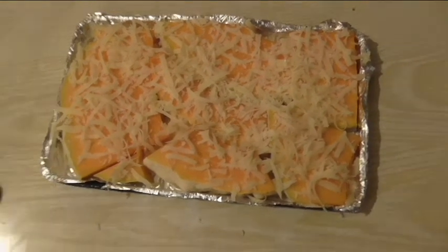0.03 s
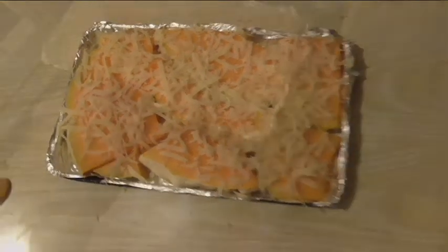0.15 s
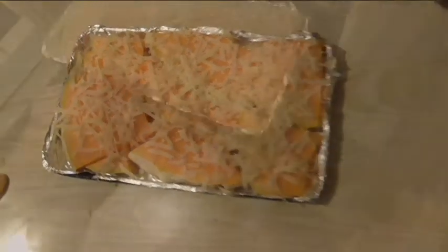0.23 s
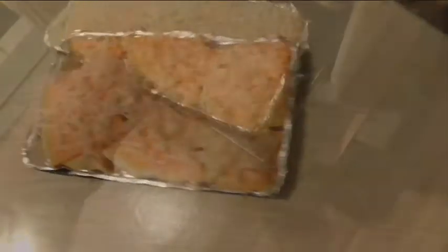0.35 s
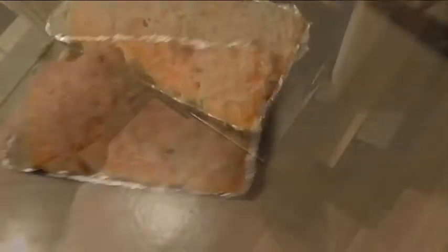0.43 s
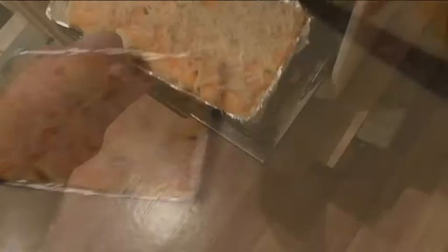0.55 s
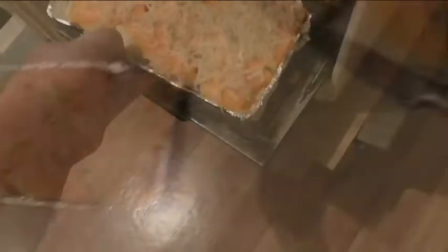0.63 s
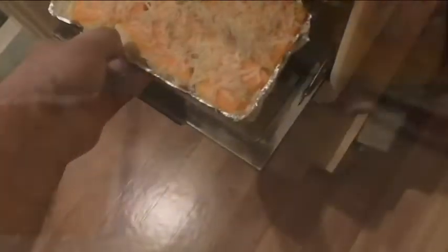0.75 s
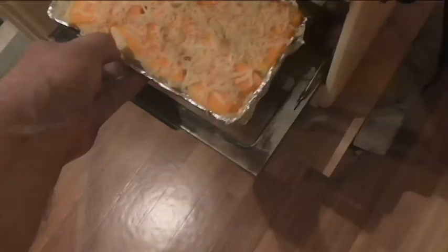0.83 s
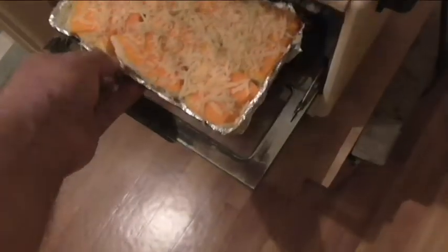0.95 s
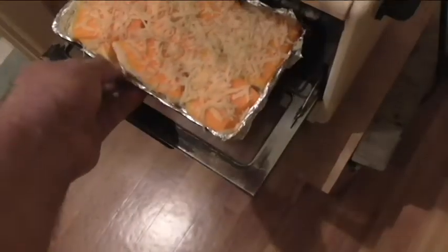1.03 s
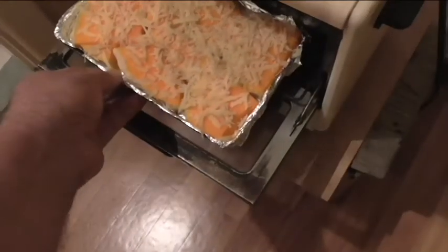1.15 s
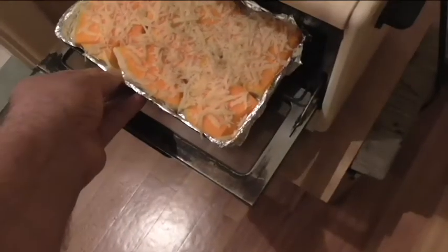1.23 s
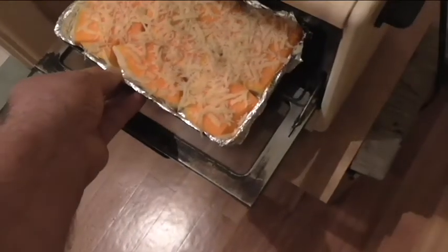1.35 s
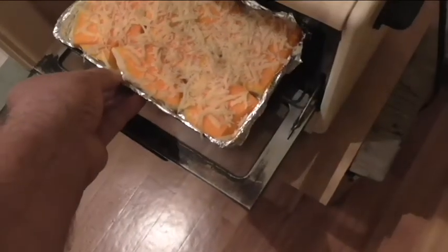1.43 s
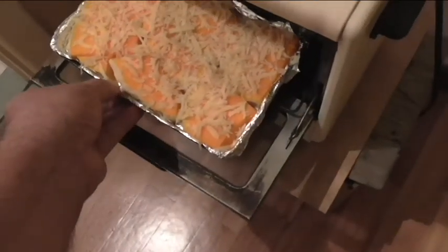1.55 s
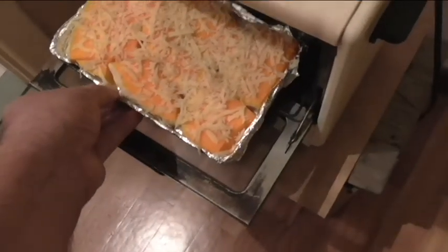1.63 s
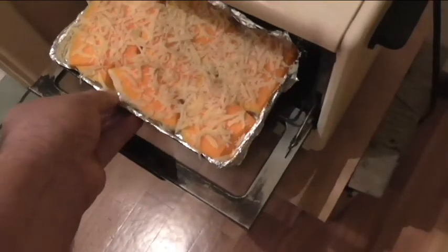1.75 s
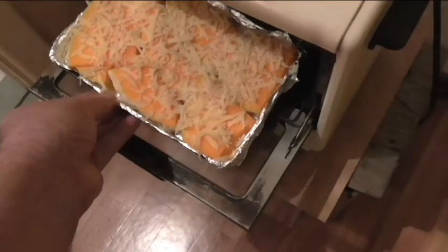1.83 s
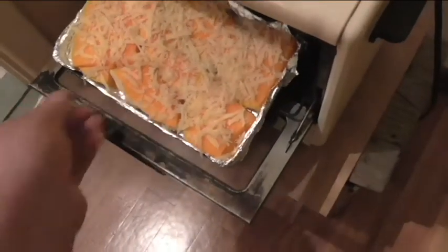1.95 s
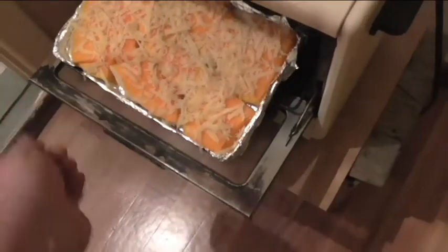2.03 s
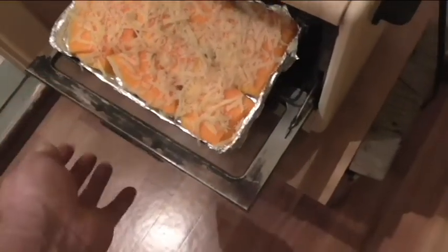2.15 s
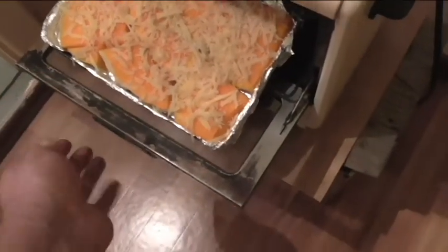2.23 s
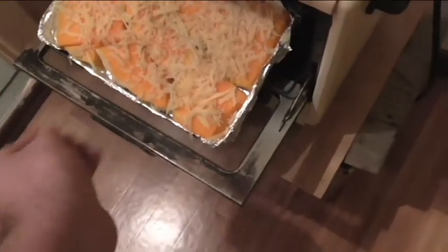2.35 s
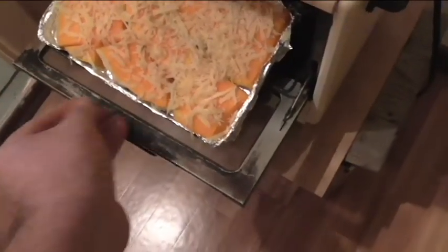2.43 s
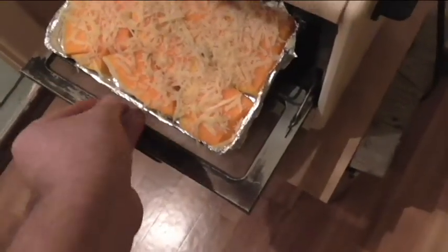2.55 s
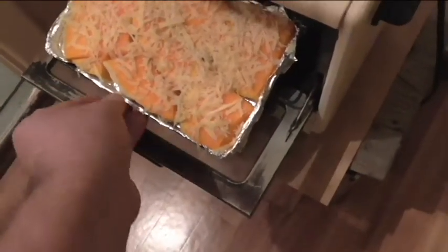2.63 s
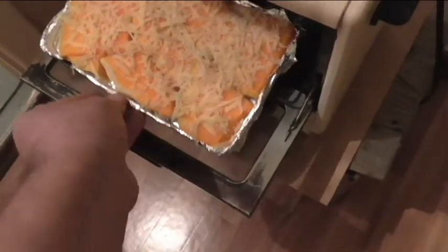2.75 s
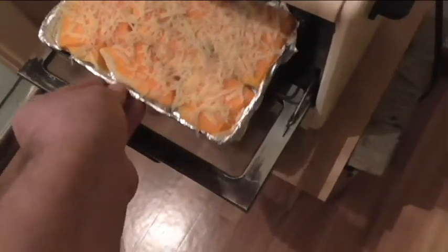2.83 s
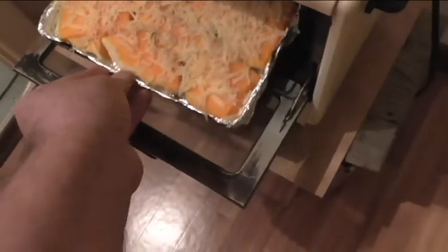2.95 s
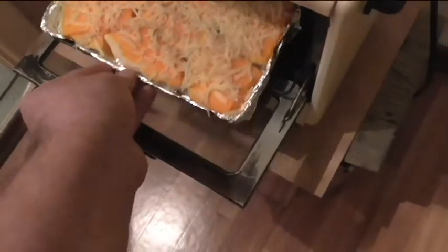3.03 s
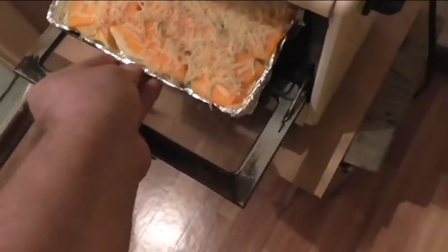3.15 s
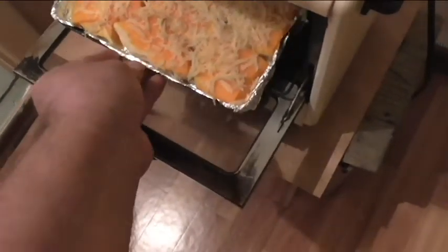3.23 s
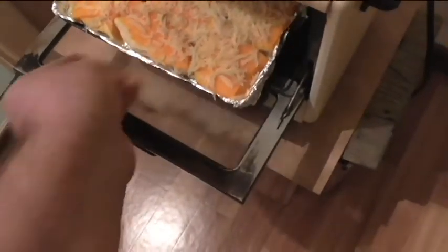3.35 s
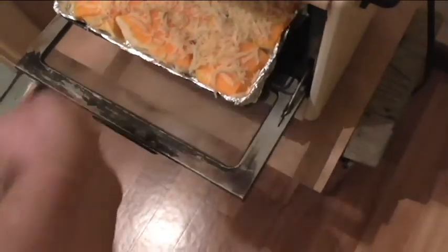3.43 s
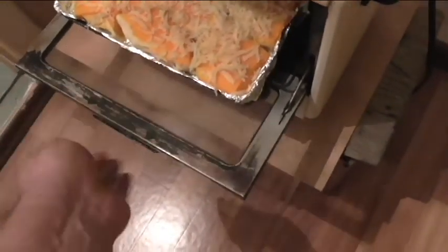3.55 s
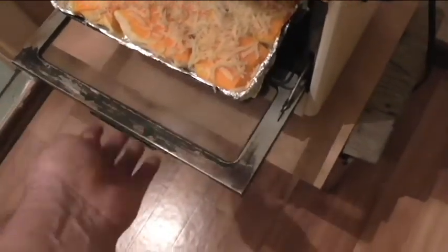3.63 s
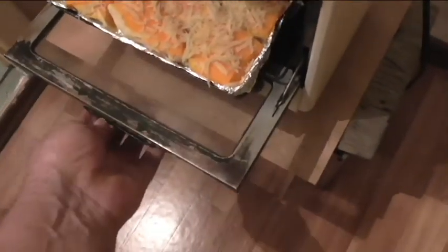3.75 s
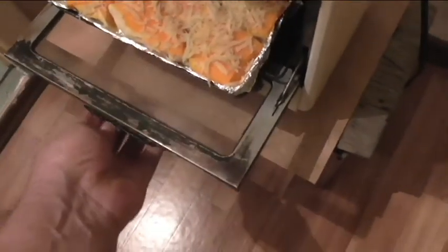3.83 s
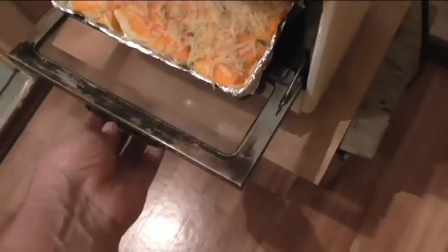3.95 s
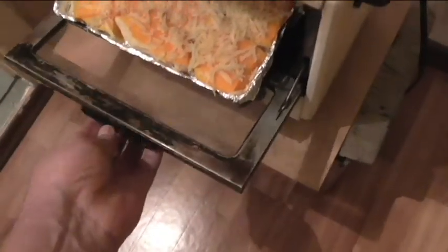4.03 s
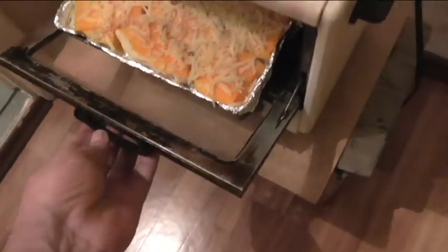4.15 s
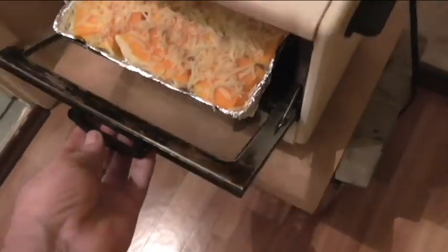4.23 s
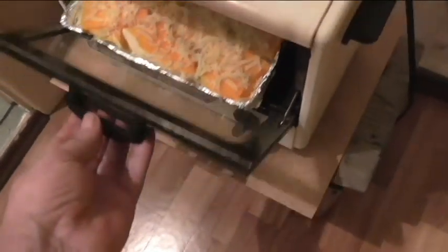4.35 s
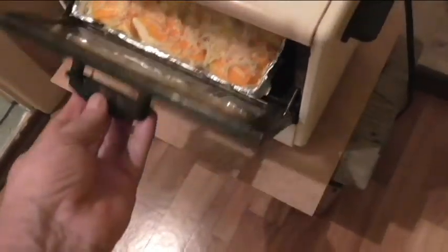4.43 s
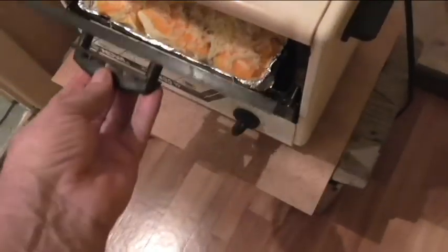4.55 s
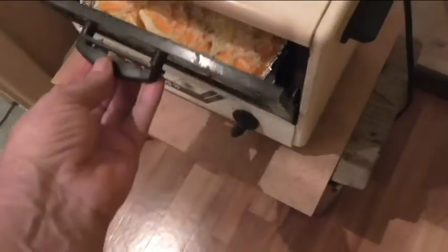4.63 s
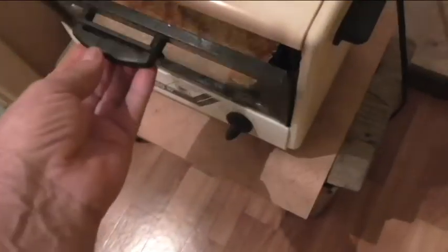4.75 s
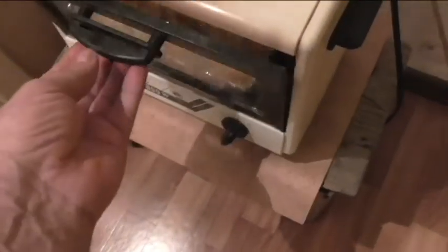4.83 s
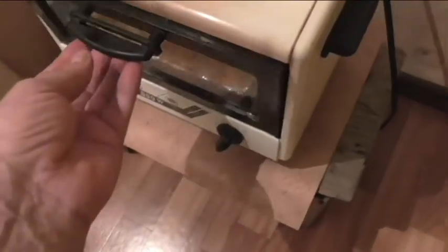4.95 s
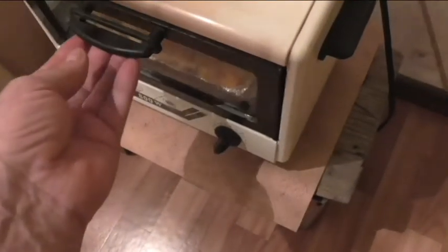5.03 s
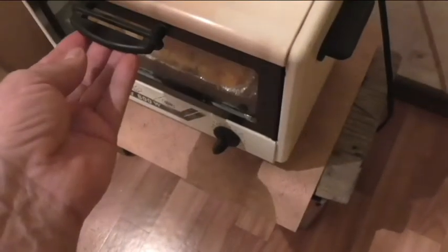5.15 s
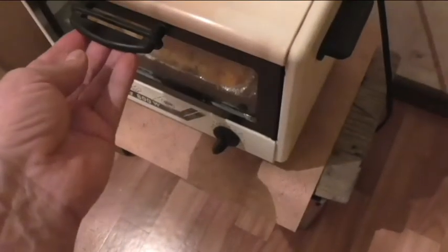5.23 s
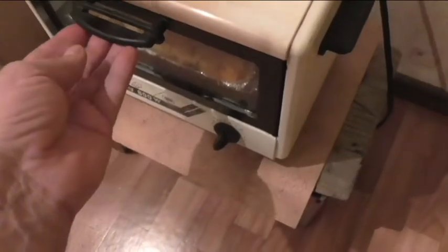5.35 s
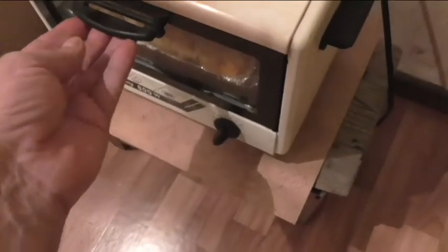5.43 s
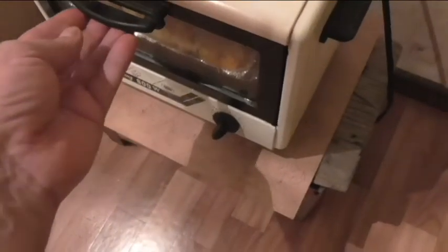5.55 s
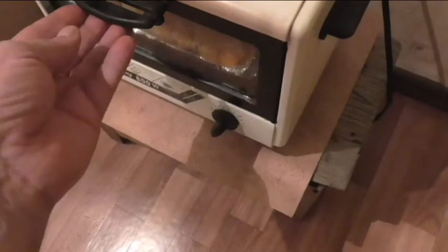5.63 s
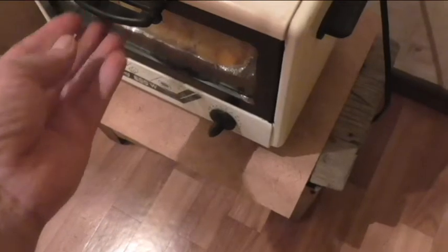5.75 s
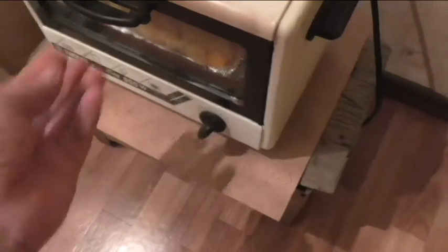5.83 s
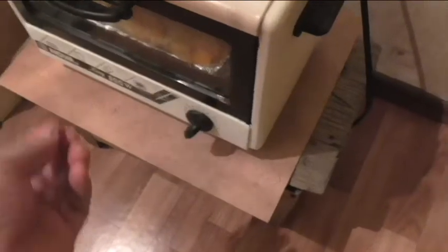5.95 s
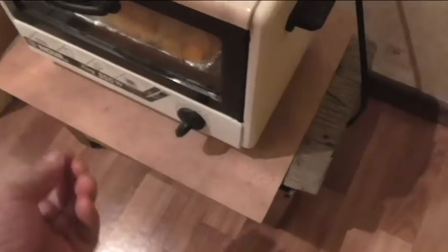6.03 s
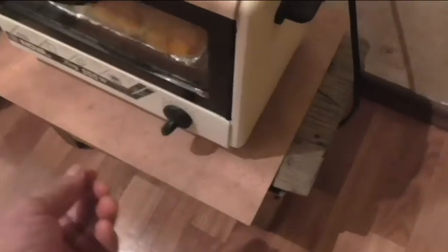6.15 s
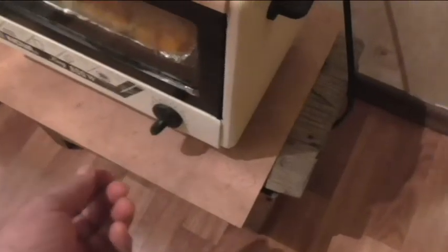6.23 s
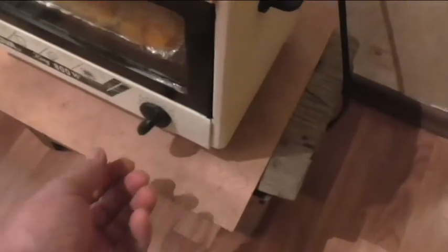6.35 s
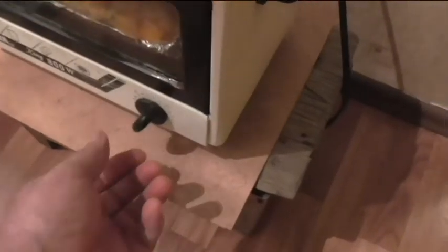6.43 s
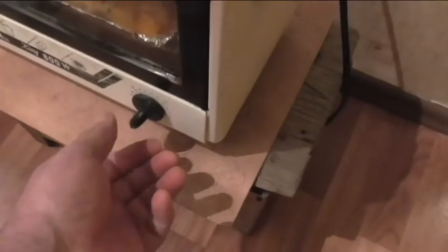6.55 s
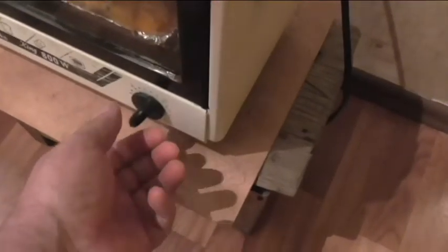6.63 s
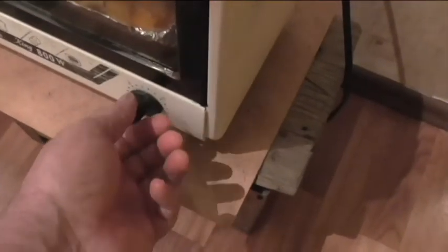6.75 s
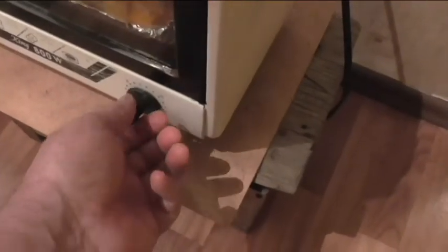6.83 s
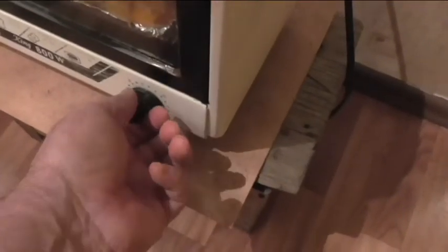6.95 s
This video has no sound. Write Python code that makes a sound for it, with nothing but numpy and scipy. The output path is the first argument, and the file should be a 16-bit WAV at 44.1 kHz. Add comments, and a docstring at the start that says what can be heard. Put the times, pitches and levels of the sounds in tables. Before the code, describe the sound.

In a quiet kitchen, a foil-lined baking tray taps and chatters on the wire rack of a toaster oven, drops into place with a loud clank and is pushed in with a scrape. The door swings up on a scraping hinge and bumps shut, then its catch clicks. The thin steel shell rings briefly after each knock. A sleeve rustles softly near the hand-held microphone.

```python
"""A sleeve rustles over quiet kitchen hiss and the rumble of a hand-held camera.
A foil-lined baking tray is set on the wire rack of a toaster oven, chatters, drops into place and
is pushed in. The camera body ticks once. The door swings up on its scraping linkage and bumps shut,
then its catch clicks. The thin steel shell rings after every blow."""
import sys
import numpy as np
from scipy import signal
from scipy.fft import rfft, irfft
from scipy.io import wavfile

SR = 44100
rng = np.random.default_rng(int(sys.argv[2]) if len(sys.argv) > 2 else 0)


def digitize_waveform(pressure):
    """Quantize a signal to 16-bit integers and store it at the path in sys.argv[1].

    Rows of a 2-D input are taken as channels; values are limited to [-1, 1].
    """
    field = np.atleast_2d(pressure).T
    bounded = np.clip(field, -1, 1)
    quanta = np.round(bounded * 32767).astype(np.int16)
    wavfile.write(sys.argv[1], SR, quanta)


N = 308203


def amp(db):
    """Decibels to gain."""
    return 10 ** (np.asarray(db) / 20)


def unit(x):
    """Scales to rms 1."""
    return x / np.sqrt(np.mean(x ** 2) + 1e-20)


def add(mix, start_s, sound):
    """Mixes a sound in at start_s."""
    part = mix[max(round(start_s * SR), 0):][:len(sound)]
    part += sound[:len(part)]


def band(x, lo_hz, hi_hz, order=3):
    """Causal band-pass."""
    return signal.sosfilt(signal.butter(order, [lo_hz, hi_hz], "bandpass", fs=SR, output="sos"), x)


def coloured(x, colour, peaks=(), peak_db=0):
    """Gives x a broad colour with resonances standing out of it."""
    hz = np.fft.rfftfreq(len(x), 1 / SR)
    colour_hz, colour_db = np.transpose(colour)
    power = amp(np.interp(np.log(hz + 1), np.log(colour_hz + 1), colour_db)) ** 2
    for centre_hz, width_hz, db in peaks:
        power += amp(db + peak_db) ** 2 / (1 + (2 * (hz - centre_hz) / width_hz) ** 2) ** 2
    return irfft(rfft(x) * np.sqrt(power), len(x))


def grains(n, per_s, spread_db):
    """Random clicks, most small and a few large."""
    sizes = amp(spread_db * np.minimum(rng.exponential(1, n), 4))
    return unit(sizes * rng.choice([-1, 1], n) * (rng.random(n) < per_s / SR))


def movement(start_s, length_s, db, ease_in=0.31, ease_out=0.27):
    """Gain of one hand movement: ramps up, holds, ramps down."""
    progress = (np.arange(N) / SR - start_s) / length_s
    return amp(db) * np.clip(np.minimum(progress / ease_in, (1 - progress) / ease_out), 0, 1)


# Each row: frequency in Hz, relative level in dB.
ROOM_COLOUR = [(29, -37), (50, 5), (151, -7.5), (296, -7), (324, -15), (397, -8), (1040, -18.5),
               (5280, -18.5), (10900, -39), (14100, -62), (22000, -120)]

def room_hiss(gain_db=-62):
    """Steady kitchen background."""
    hiss = coloured(rng.standard_normal(N), ROOM_COLOUR)
    return amp(gain_db) * band(hiss, 40, 9300, order=2) / np.std(band(hiss, 85, 11000))


def camera_rumble(steady_db=-59):
    """The hand on the camera rumbles steadily, and more as it turns to the oven."""
    rumble = unit(band(rng.standard_normal(N), 19.0, 34.3, order=2))
    return rumble * (amp(steady_db) + movement(start_s=-0.2, length_s=0.63, db=-61))


# Each row: frequency in Hz, relative level in dB.
CLOTH_COLOUR = [(590, -11.5), (1000, -12.5), (2530, -16), (4420, -3), (5680, -2.5), (8050, -20),
                (9930, -25), (10900, -41), (14100, -63), (22000, -120)]
# Each row: start in seconds, length in seconds, relative level in dB.
ARM_MOVES = [(-0.25, 1.03, -60.5), (0.664, 0.32, -61), (2.834, 0.52, -58.5), (4.049, 0.3, -56.5),
             (6.12, 1.34, -55.5)]
# Each row: start in seconds, relative level in dB.
SLEEVE_BRUSHES = [(2.178, -43.5), (2.8709, -55), (2.941, -45), (3.8761, -44), (6.366, -48.5),
                  (6.5094, -49.5), (6.646, -44), (6.7675, -45.5)]

def sleeve(move_db=-2, brush_db=-6, brush_rise_s=0.0098):
    """Cloth fibres slide past each other as the arm moves, with a few quick brushes."""
    fibres = unit(coloured(grains(N, per_s=6000, spread_db=2.5), CLOTH_COLOUR))
    speed = amp(move_db) * sum(movement(*move) for move in ARM_MOVES)
    age = np.arange(SR // 4) / SR / brush_rise_s
    for start_s, db in SLEEVE_BRUSHES:
        add(speed, start_s, amp(db + brush_db) * np.sqrt(age) * np.exp(-age / 2))
    return fibres * speed


def sheet_ring(n, treble_spacing_hz=14):
    """Random, closely packed modes of thin metal, denser in the bass."""
    hz = np.fft.rfftfreq(n, 1 / SR)
    is_mode = rng.random(len(hz)) < hz[1] / treble_spacing_hz * (1 + 1000 / (hz + 200))
    real, imag = rng.standard_normal((2, len(hz)))
    return unit(irfft(is_mode * (real + 1j * imag), n))


# Steel shell and rack. Each row: frequency in Hz, relative level in dB, t60 in seconds.
SHELL_MODES = [(195.8, -11.5, 0.83), (214.7, -4.5, 0.97), (249.3, -9, 0.87), (321.5, 3.5, 0.65),
               (368, 6.5, 0.57), (414, -12.5, 0.59), (443, -2.5, 0.35), (606, -9.5, 0.61), (645, 0, 0.36),
               (735, -9, 0.5), (815, -10, 0.49), (1466, -3.5, 0.24), (1987, 2, 0.14), (2800, 9, 0.059),
               (3350, 1.5, 0.072), (4300, -5, 0.42), (5750, 9.5, 0.018)]
# Each row: low and high edge in Hz, then rise, crack t60 before damping and sheet t60 in seconds.
BLOW_BANDS = [(242, 491, 0.0006, 0.072, 0.79), (555, 1023, 0.00053, 0.19, 0.8),
              (1190, 2910, 0.00021, 0.18, 0.48), (3060, 5830, .0004, 0.14, 0.46)]

def blow(levels_db, sheet_db, fizz_db, damping, shell_over_sheet_db=4):
    """One blow on steel: a short crack, the dense ring of the sheet, the modes of the shell."""
    t = np.arange(SR) / SR
    attack = slice(0, SR // 40)
    out, sheet, noise = np.zeros(SR), sheet_ring(SR), rng.standard_normal(SR)
    shell_db = sheet_db + shell_over_sheet_db
    below_hz = 0
    for db, (lo_hz, hi_hz, rise_s, crack_t60_s, sheet_t60_s) in zip(levels_db, BLOW_BANDS):
        onset = 1 - np.exp(-t / rise_s)
        burst = onset * noise * amp(-60 * t * damping / crack_t60_s)
        crack = band(burst, lo_hz, hi_hz, order=4)
        ring = band(onset * sheet * amp(-60 * t / sheet_t60_s), lo_hz, hi_hz, order=4)
        part = crack / np.std(crack[attack]) + amp(sheet_db) * ring / np.std(ring[attack])
        for hz, mode_db, t60_s in SHELL_MODES:
            if below_hz <= hz < hi_hz:
                envelope = onset * amp(shell_db + mode_db - 60 * t / t60_s)
                part += envelope * np.sin(2 * np.pi * (hz * t + rng.random()))
        out += amp(db) * part / np.std(part[attack])
        below_hz = hi_hz
    fizz = band(burst, 6500, 11000)  # dies with the top band's crack
    return out + amp(levels_db[-1] + fizz_db) * fizz / np.std(fizz[attack])


def blows(table, damping, low_mid_db, high_mid_db, fizz_db=-23, firm_db=-30.5, thin_db_per_db=0.34):
    """A series of blows; those lighter than firm_db are thinner in the middle bands."""
    out = np.zeros(N)
    edges_hz = np.array(BLOW_BANDS)[:, 0]
    octaves = np.log2(edges_hz / edges_hz[0])
    for start_s, strength_db, tilt_db, ring_db in table:
        thin_db = thin_db_per_db * min(strength_db - firm_db, 0)
        mids_db = np.array([0, low_mid_db + thin_db, high_mid_db + thin_db, 0])
        levels_db = strength_db + tilt_db * octaves + mids_db
        add(out, start_s, blow(levels_db, ring_db, fizz_db + tilt_db, damping))
    return out


# Each row: start in seconds, relative level in dB, tilt in dB per octave, ring over crack in dB.
TRAY_BLOWS = [(0.831, -38.5, -2.24, 1), (0.926, -53, 0, -5), (1.1575, -40, 2.5, -5.5),
              (2.3372, -24.5, -1.94, -7), (2.457, -37, -4.5, -10.5), (2.565, -35.5, -6.5, -5),
              (2.726, -54.5, -1.5, -3), (2.872, -56.5, 0.6, -5), (2.896, -52, -1.5, 3),
              (3.063, -50.5, -2, -6), (3.327, -43, 1, -1), (3.525, -38.5, -4, 1), (3.607, -45.5, -0.3, 0)]

def tray_blows():
    """The tray strikes the wire rack."""
    return amp(-0.5) * blows(TRAY_BLOWS, damping=1.1, low_mid_db=-1.5, high_mid_db=2.5)


def friction(strokes, colour, peaks, peak_db, slips_per_s, spread_db, ring_t60_s, ring_db, gain_db,
             scrape_db, scrape_growth, fizz_db, fizz_growth, crinkle_db=-7):
    """Tiny slips ring the metal. The body follows the force; scrape and fizz by growth in dB per dB."""
    out = np.zeros(N)
    ring_t = np.arange(SR // 2) / SR
    metal = sheet_ring(len(ring_t)) * amp(-60 * ring_t / ring_t60_s)
    metal *= amp(ring_db) / np.linalg.norm(metal)
    metal[0] += 1  # the slip itself, ahead of its ring
    for stroke in strokes:
        times_s, force_db = np.transpose(stroke)
        top_db = force_db.max()
        slips = grains(SR + len(metal) - 1, slips_per_s, spread_db)
        sliding = coloured(signal.fftconvolve(slips, metal, "valid"), colour, peaks, peak_db)
        body = unit(band(sliding, 90, 1100, order=5))
        scrape = amp(scrape_db) * unit(band(sliding, 1100, 6500, order=5))
        treble = unit(band(sliding, 6500, 11000, order=5))
        crinkle = unit(band(grains(SR, per_s=230, spread_db=3), 4400, 10000))  # foil creases snap
        fizz = amp(fizz_db) * unit(treble + amp(crinkle_db) * crinkle)
        first_s, last_s = times_s[0], times_s[-1]
        t = first_s - 0.05 + np.arange(SR) / SR
        fade = np.interp(t, [first_s - 0.012, first_s, last_s, last_s + 0.04], [0, 1, 1, 0])
        drop_db = np.interp(t, times_s, force_db) - top_db
        for part, growth in [(body, 1), (scrape, scrape_growth), (fizz, fizz_growth)]:
            add(out, t[0], part * fade * amp(top_db + growth * drop_db))
    return amp(gain_db) * out


# Each row: start in seconds, length in seconds, relative level in dB.
CHATTER_SPANS = [(0.85, 0.39, -40), (1.179, 0.66, -34)]
# Each row: frequency in Hz, relative level in dB.
CHATTER_COLOUR = [(88, -57), (150, -22), (260, -8), (361, -5.5), (585, -11), (794, -17), (868, -12.5),
                  (5210, -12), (10900, -35), (14100, -86), (22000, -120)]
# Each row: centre in Hz, width in Hz, relative level in dB.
CHATTER_RESONANCES = [(114, 12, -0.5), (214, 35, -4.5), (260, 31, -4), (363, 37, -0.5), (460, 28, -8),
                      (577.5, 53, 3.5), (700, 160, -3.5), (863, 53, -8), (1960, 110, -4.5), (2700, 51, -26)]

def tray_chatter(fade_db_per_s=30, rest_db=-11):
    """After landing, the tray trembles on the wires, fades steadily, then comes to rest."""
    progress = np.linspace(0, 1, 10)
    strokes = []
    for start_s, length_s, db in CHATTER_SPANS:
        force_db = db - fade_db_per_s * length_s * progress + rest_db * progress ** 6
        strokes.append(np.column_stack([start_s + length_s * progress, force_db]))
    return friction(strokes, CHATTER_COLOUR, CHATTER_RESONANCES, peak_db=-1.5,
                    slips_per_s=700, spread_db=2, ring_t60_s=0.46, ring_db=0.5, gain_db=-1.5,
                    scrape_db=-7, scrape_growth=1.15, fizz_db=-28.5, fizz_growth=0.89)


# Each row: time in seconds, relative hand force in dB.
PUSH_FORCE = [(3.14, -64), (3.17, -42.5), (3.332, -35.5), (3.496, -40), (3.532, -40), (3.608, -38),
              (3.76, -55)]
# Each row: frequency in Hz, relative level in dB.
PUSH_COLOUR = [(88, -47), (150, -13.5), (318, -5.5), (374, 3), (498, -3.5), (596, -2), (884, -10),
               (1120, -20), (5300, -16.5), (10900, -43), (14100, -83), (22000, -120)]
# Each row: centre in Hz, width in Hz, relative level in dB.
PUSH_RESONANCES = [(117.6, 21, -1.5), (211, 12, -5.5), (364, 30, 5.5), (604, 78, 0.5), (729, 35, 3),
                   (896, 49, -2), (2440, 90, -21)]

def tray_push():
    """The tray scrapes along the rack."""
    return friction([PUSH_FORCE], PUSH_COLOUR, PUSH_RESONANCES, peak_db=0,
                    slips_per_s=650, spread_db=4, ring_t60_s=0.17, ring_db=2, gain_db=-2.5,
                    scrape_db=-1.5, scrape_growth=1.45, fizz_db=-18.5, fizz_growth=1.6)


def struck_modes(modes, t):
    """Decaying sines, struck together."""
    return sum(amp(db - 60 * t / t60_s) * np.sin(2 * np.pi * hz * t) for hz, db, t60_s in modes)


# Each row: frequency in Hz, level in dB, t60 in seconds.
CAMERA_MODES = [(5000, -30, 0.016), (648, -33.5, 0.028)]

def camera_tick(snap_db=-35, snap_t60_s=0.012, push_db=-12, push_s=0.003):
    """A dry tick on the camera body, with a low push carried through the case."""
    t = np.arange(SR // 10) / SR
    age = t / push_s
    push = -amp(push_db) * age * (1 - age / 2.8) * np.exp(-age)
    burst = amp(snap_db - 60 * t / snap_t60_s) * rng.standard_normal(len(t))
    return push + band(burst, 300, 6000, order=2) + struck_modes(CAMERA_MODES, t)


# Each row: start in seconds, relative level in dB, tilt in dB per octave, ring over crack in dB.
DOOR_KNOCKS = [(4.076, -52, -2, -3), (4.5255, -30, -5.5, -17), (4.58, -40, -9, -20), (4.787, -34, 1.1, -10),
               (4.798, -35, -1.5, -3), (4.841, -32, -3, -9), (5.948, -52, -5, -5)]

def door_knocks():
    """Door and handle knock and ring the shell."""
    return amp(-1.5) * blows(DOOR_KNOCKS, damping=1.02, low_mid_db=-1.5, high_mid_db=-4)


def door_hum(hz=374, width_hz=45):
    """Rubbing fingers and hinge keep a strong shell mode humming faintly in the door."""
    ring = unit(band(rng.standard_normal(N), hz - width_hz / 2, hz + width_hz / 2, order=1))
    return ring * movement(start_s=4.244, length_s=1.46, db=-51.5)


def door_swing(start_s=4.33, shut_s=4.809, settled_s=5.12, rise_db_per_s=56, fall_db_per_s=66.5):
    """The linkage scrapes louder and brighter as the door speeds up, and dies away once it is shut."""
    shut_db = -32.5
    stroke = [(start_s, shut_db - rise_db_per_s * (shut_s - start_s)),
              (shut_s, shut_db),
              (settled_s, shut_db - fall_db_per_s * (settled_s - shut_s))]
    return linkage_scrape(stroke)


# Each row: frequency in Hz, relative level in dB.
LINKAGE_COLOUR = [(88, -55), (150, -18.5), (374, 3.5), (516, -4.5), (713, -3), (1120, -10.5), (2240, -19.5),
                  (4430, -14.5), (7190, -24.5), (10900, -43), (14100, -79), (22000, -120)]
# Each row: centre in Hz, width in Hz, relative level in dB.
LINKAGE_RESONANCES = [(112.4, 21, -3), (235.4, 22, 0.5), (390, 40, -6), (456, 36, 4), (610, 56, -2),
                      (1880, 160, -13), (3700, 120, -22), (4350, 220, -18)]

def linkage_scrape(stroke):
    """Metal slides on metal in the door's linkage."""
    return friction([stroke], LINKAGE_COLOUR, LINKAGE_RESONANCES, peak_db=-1.5,
                    slips_per_s=1000, spread_db=2.5, ring_t60_s=0.22, ring_db=2, gain_db=-0.5,
                    scrape_db=-3.5, scrape_growth=1.37, fizz_db=-16.5, fizz_growth=2.56)


# Each row: start in seconds, gain in dB.
CATCH_CLICKS = [(5.7725, -43), (5.7848, -38.5), (5.8132, -40)]
# Each row: frequency in Hz, relative level in dB, t60 in seconds.
CATCH_MODES = [(267, -10.5, 0.45), (366, -4.5, 0.38), (620, -9, 0.035), (2900, -11, 0.023),
               (4430, -10, 0.025)]

def door_catch(snap_t60_s=0.013):
    """The catch clicks as the fingers let go: a snap, a ping and a hollow note of the door."""
    out, t = np.zeros(N), np.arange(SR // 2) / SR
    ring = struck_modes(CATCH_MODES, t)
    for start_s, db in CATCH_CLICKS:
        burst = amp(-60 * t / snap_t60_s) * rng.standard_normal(len(t))
        add(out, start_s, amp(db) * (band(burst, 400, 4800, order=2) + ring))
    return out


def scene(tick_s=4.0198):
    """Tray in, door shut, over the quiet room."""
    tray = tray_blows() + tray_chatter() + tray_push()
    door = door_knocks() + door_swing() + door_hum() + door_catch()
    mix = tray + door + sleeve() + room_hiss() + camera_rumble()
    add(mix, tick_s, camera_tick())
    return mix[None]


def record(dry):
    """Low-pass and a small DC offset."""
    cutoff_hz, offset = 10900, 0.0099
    lowpass = signal.firwin(161, cutoff_hz, window=("kaiser", 7), fs=SR)
    return signal.oaconvolve(dry, lowpass[None], "same") + offset


dry = scene()
out = record(dry)
digitize_waveform(out)
```